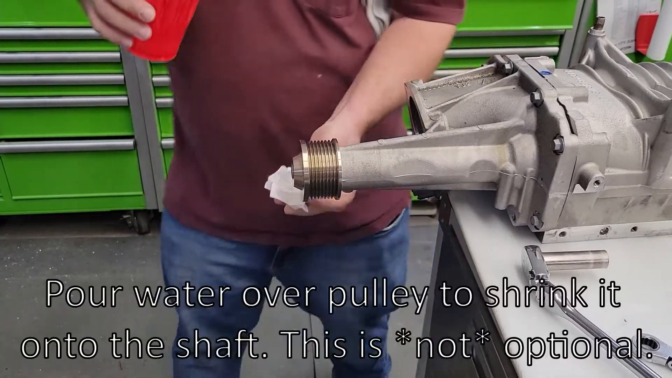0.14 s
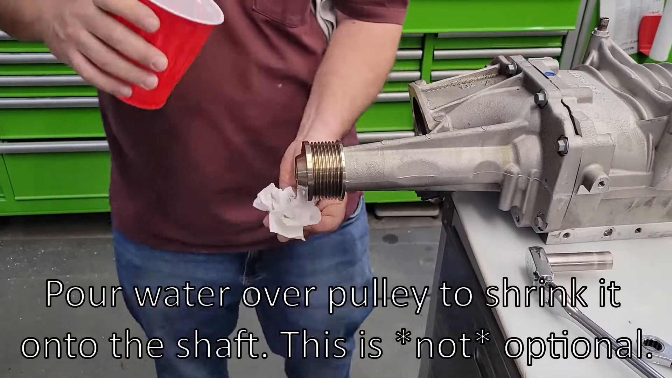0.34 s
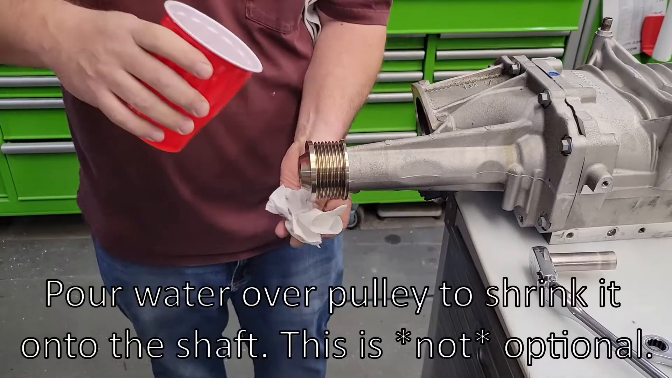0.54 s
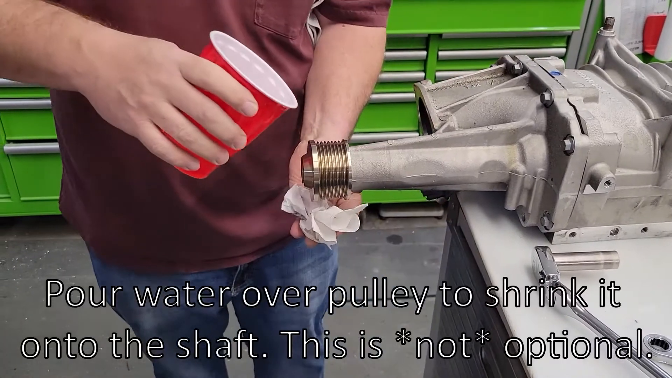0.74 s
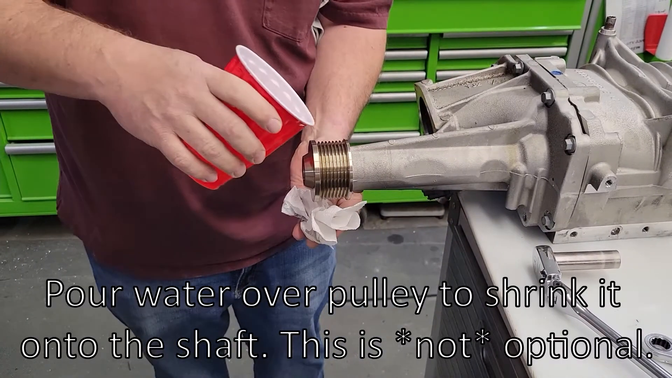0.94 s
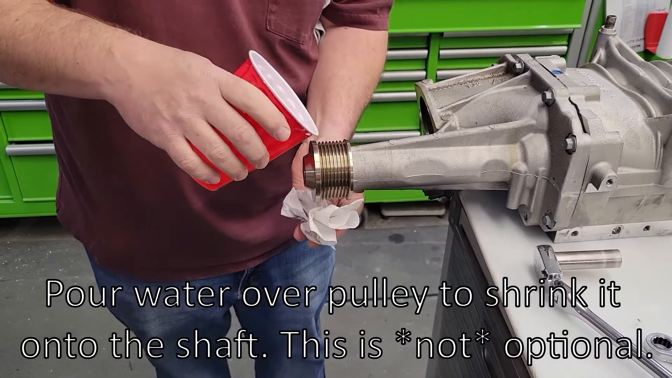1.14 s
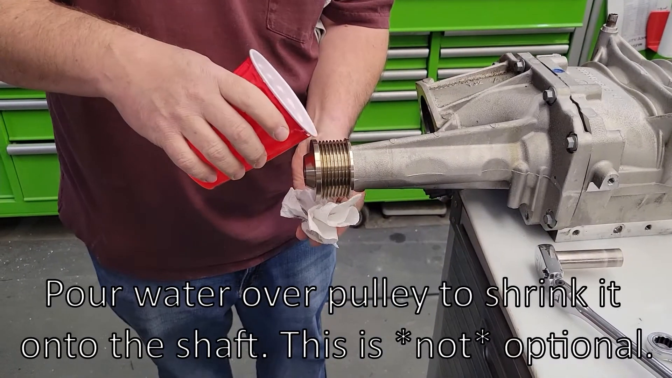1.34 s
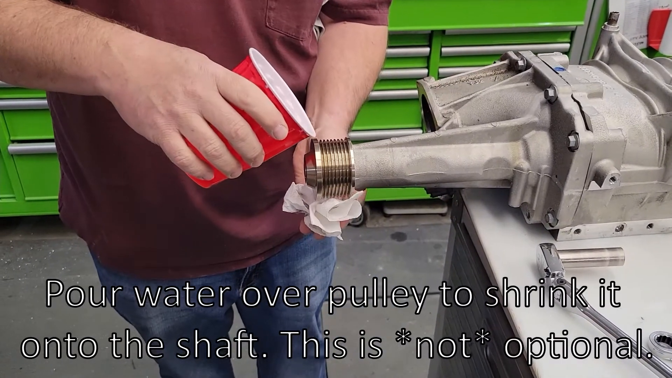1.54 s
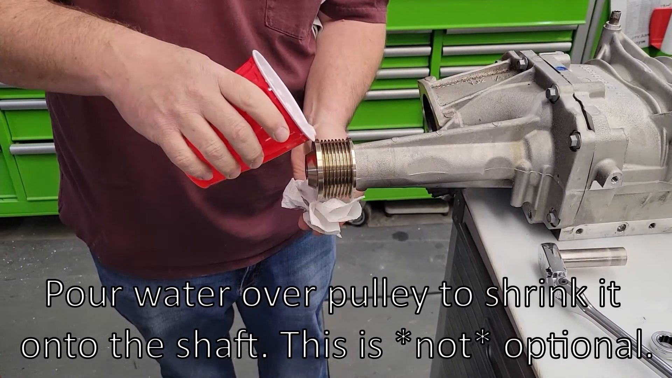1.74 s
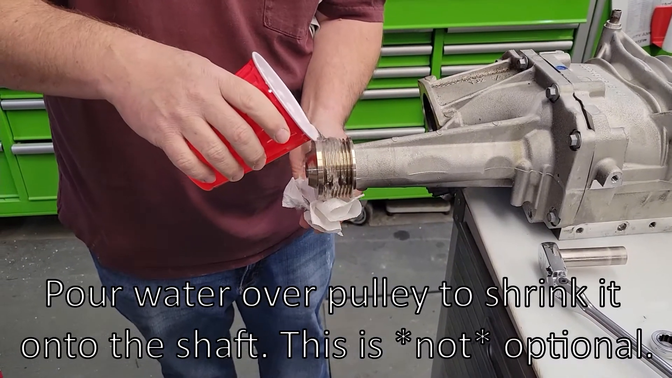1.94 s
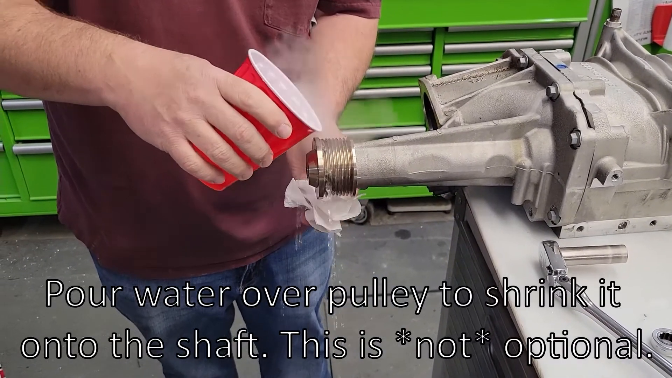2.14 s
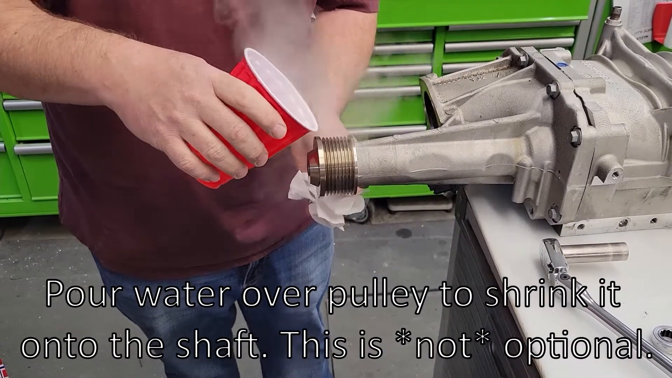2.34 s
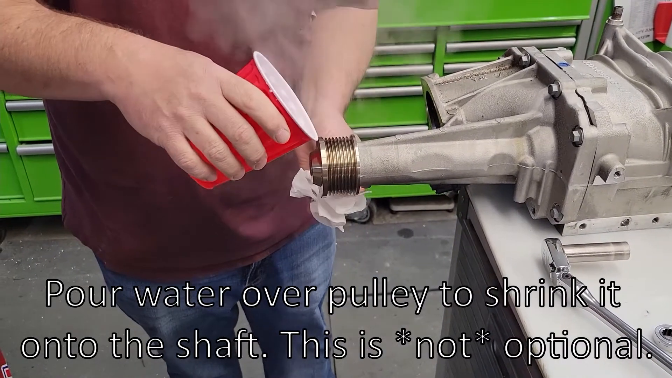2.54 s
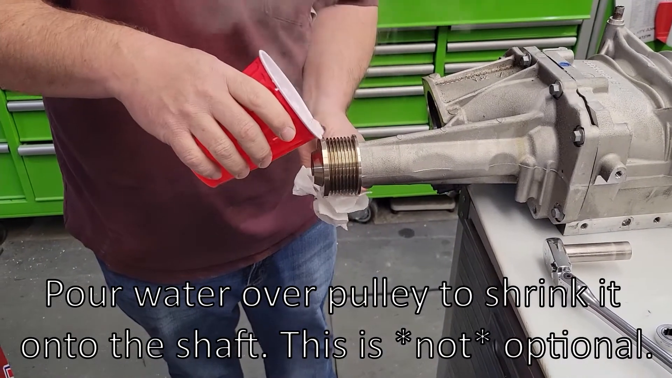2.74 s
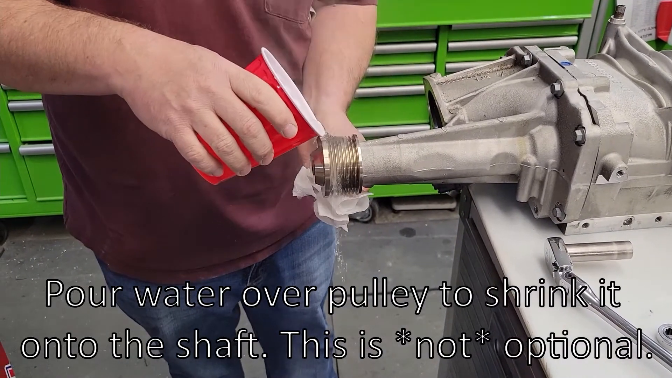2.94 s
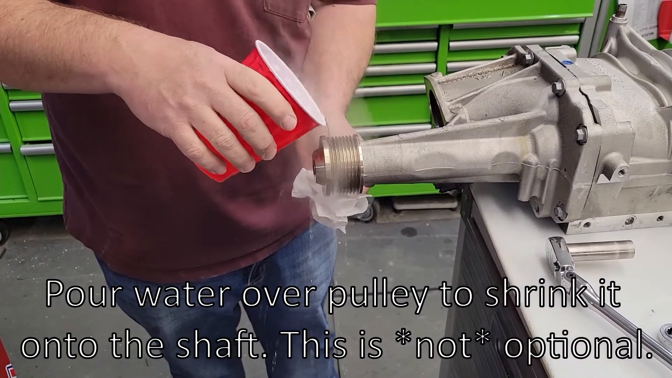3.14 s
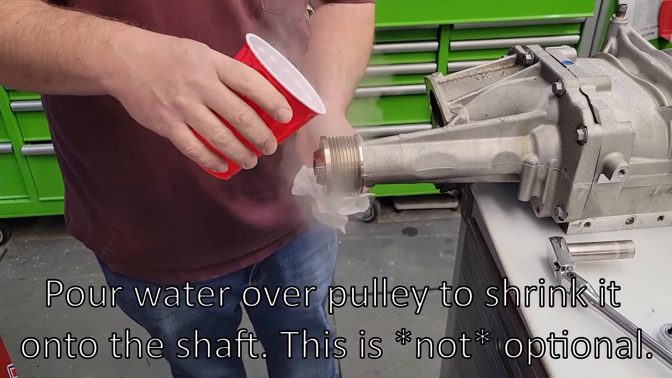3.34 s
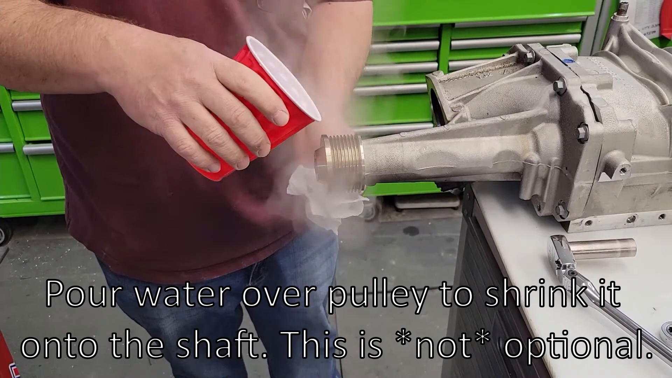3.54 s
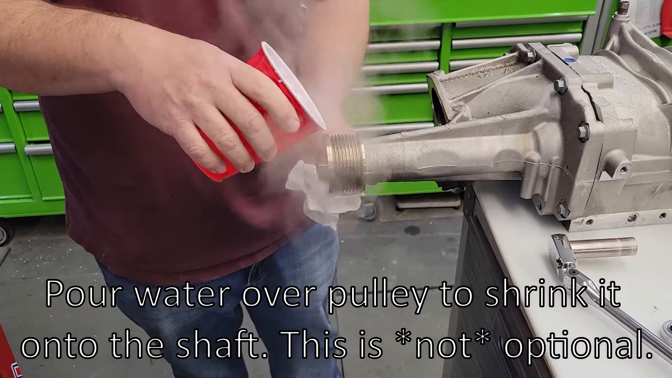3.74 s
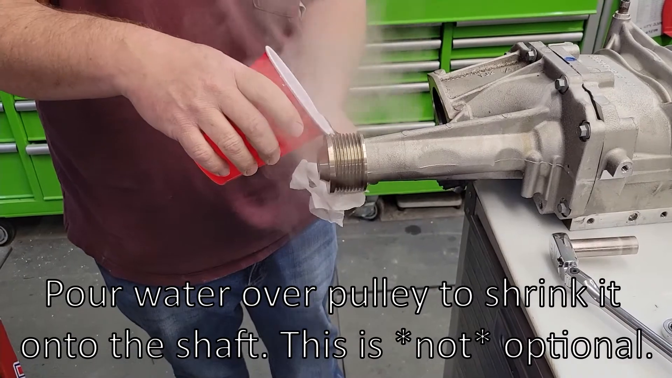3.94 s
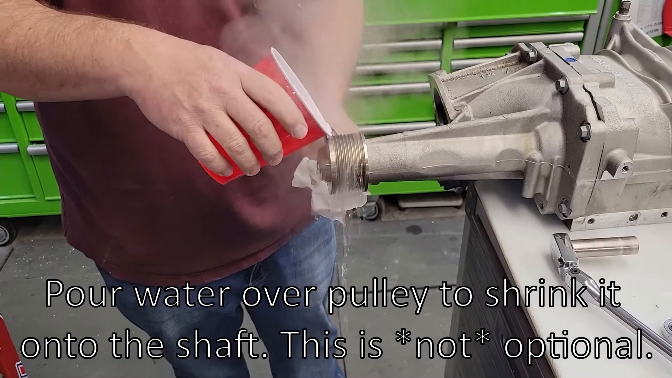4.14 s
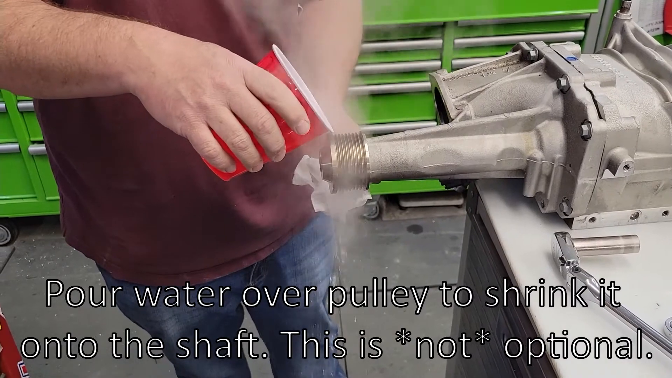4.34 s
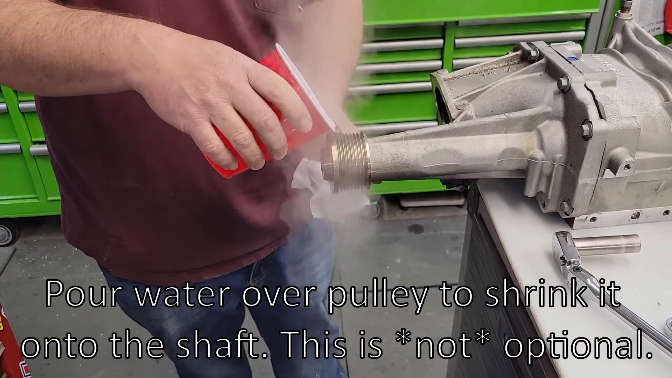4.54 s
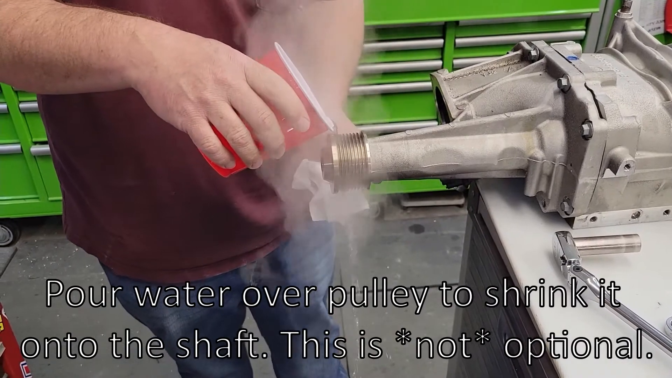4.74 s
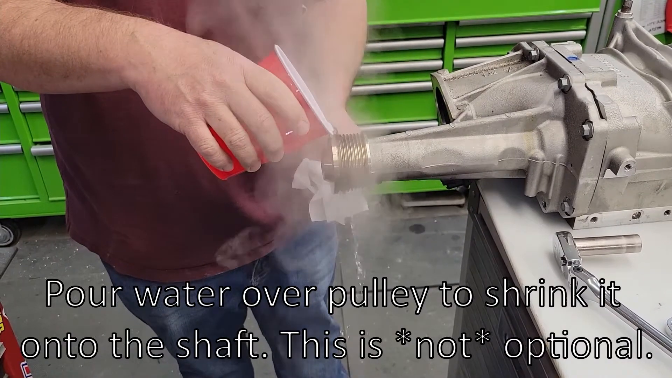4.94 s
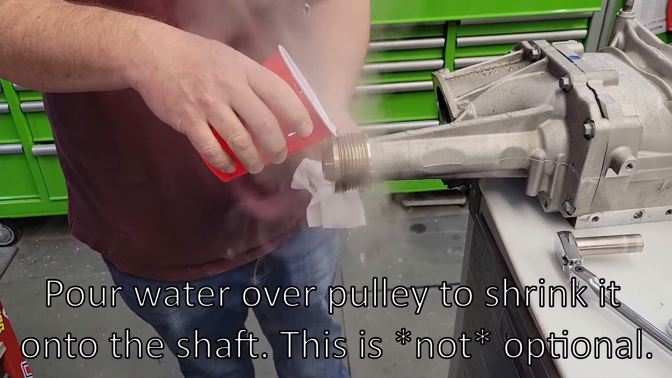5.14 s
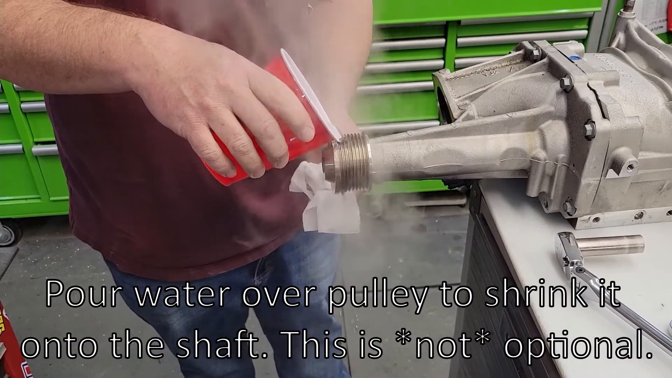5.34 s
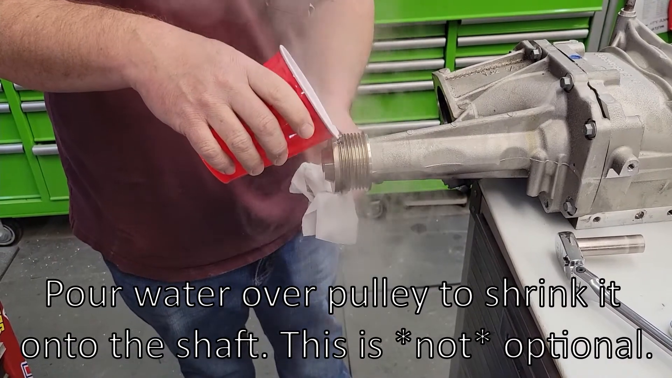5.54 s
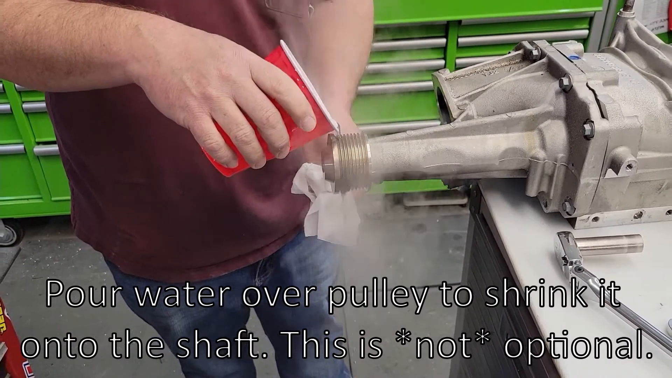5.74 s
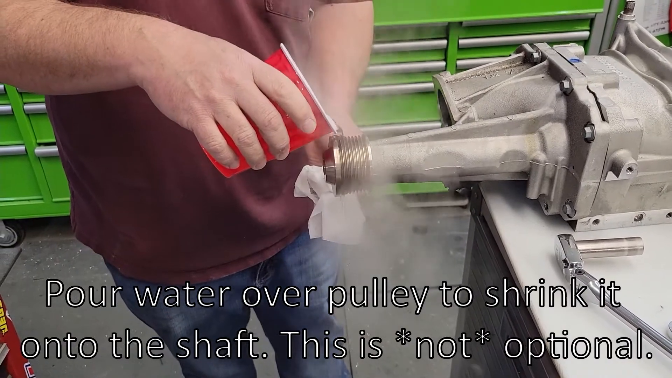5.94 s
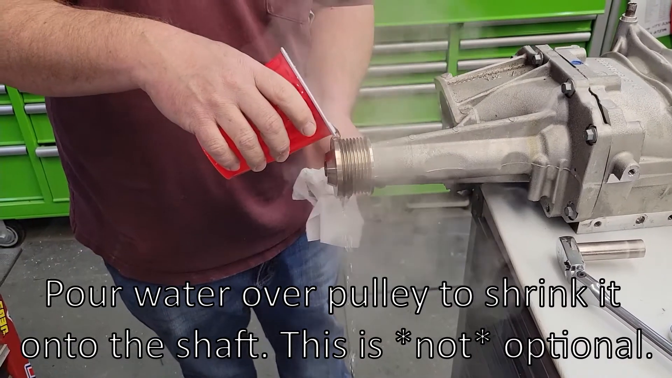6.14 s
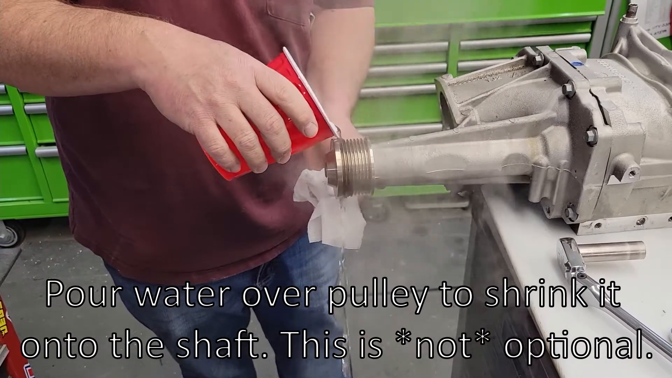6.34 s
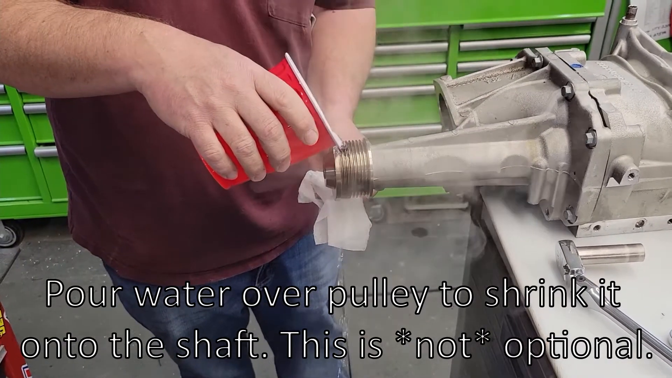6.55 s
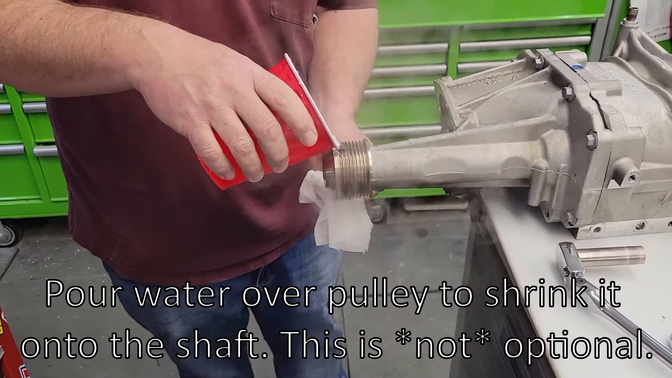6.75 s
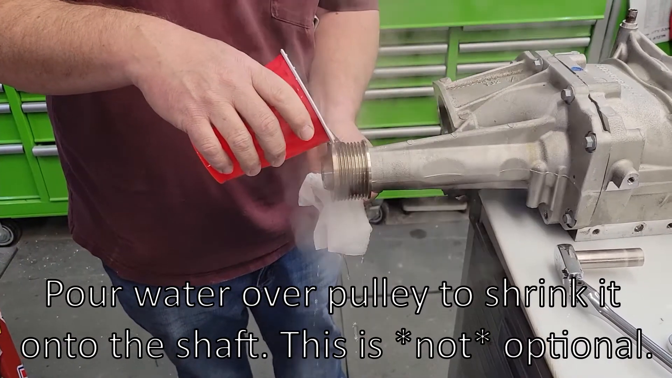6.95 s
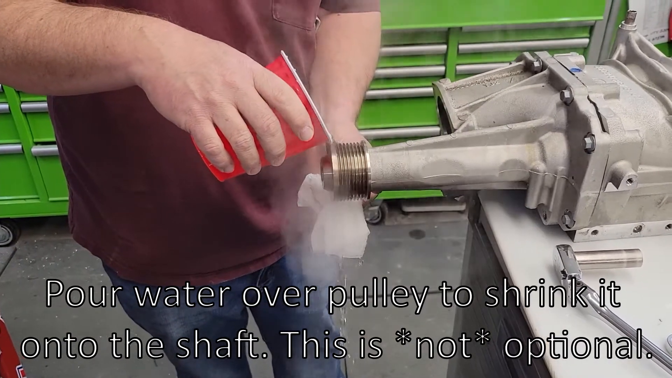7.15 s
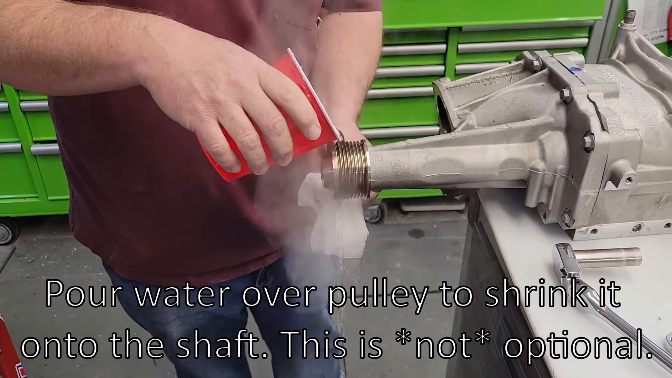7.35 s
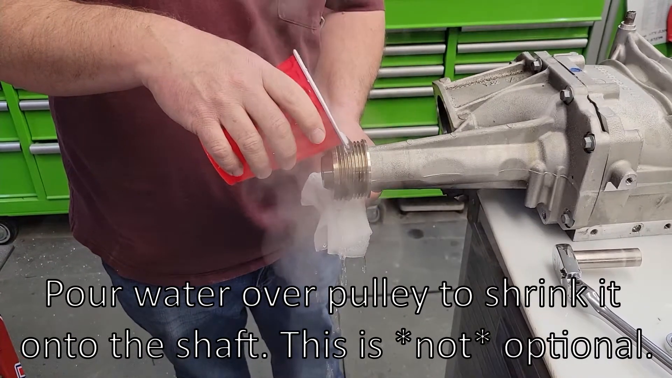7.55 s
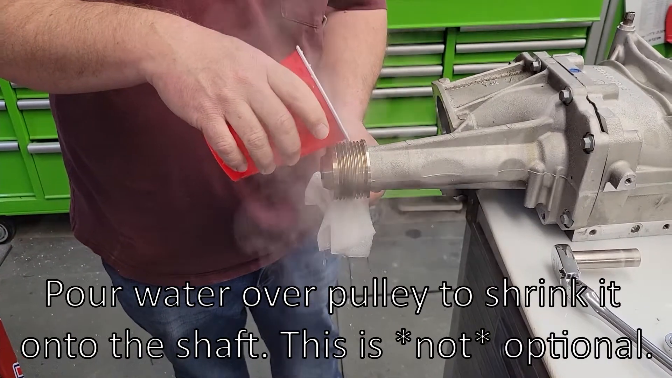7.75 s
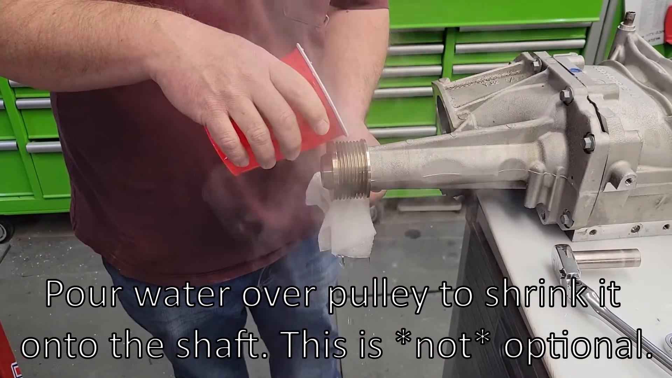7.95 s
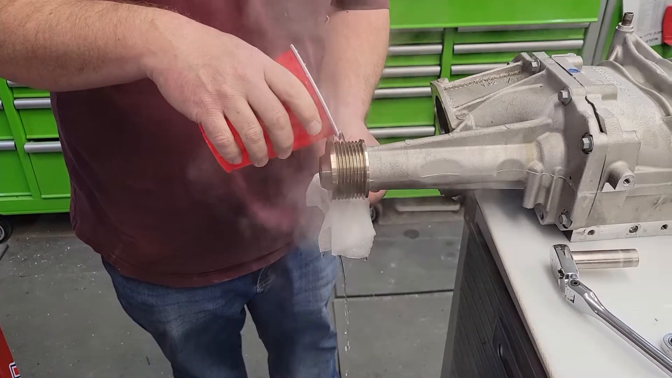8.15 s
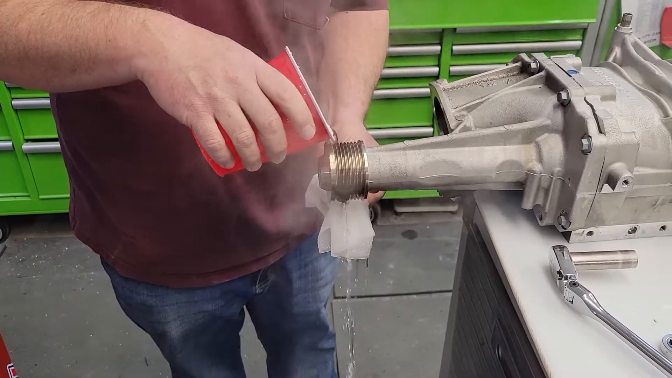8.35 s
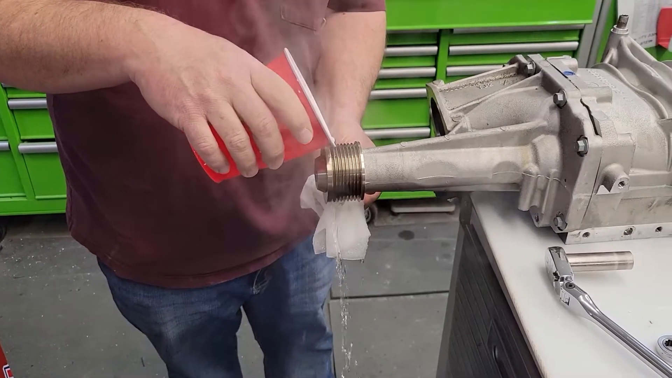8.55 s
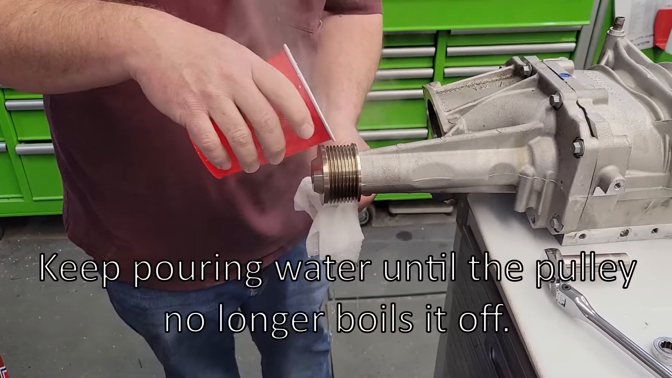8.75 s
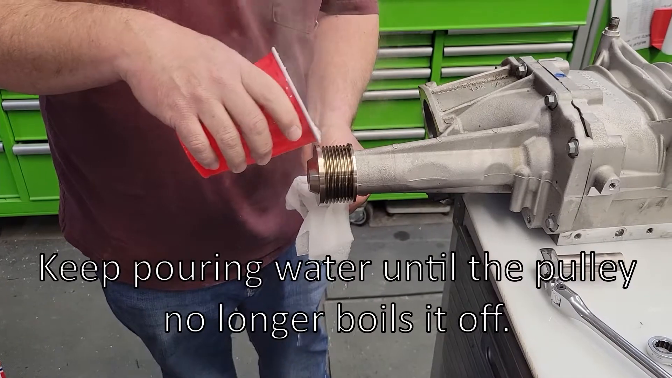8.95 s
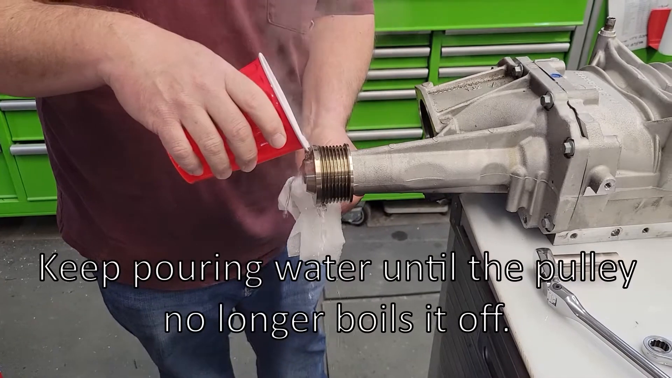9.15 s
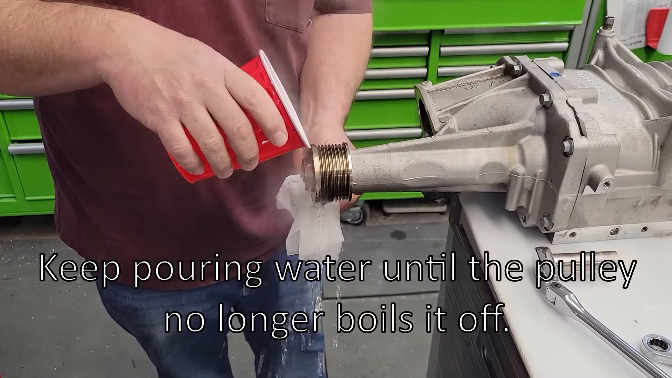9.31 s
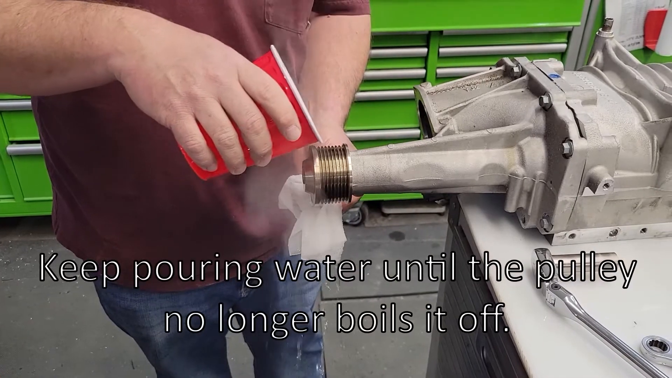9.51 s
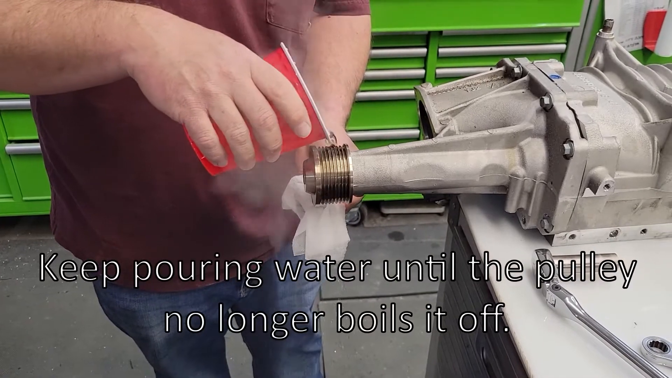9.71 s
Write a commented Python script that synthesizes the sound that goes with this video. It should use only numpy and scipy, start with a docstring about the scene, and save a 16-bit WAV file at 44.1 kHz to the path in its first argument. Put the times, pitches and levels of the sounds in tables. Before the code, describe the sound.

Close stereo pickup on a hot metal part in a reverberant workshop. Brief rustling and small hard clacks come first over quiet room air and hum. Steam flares sharply, with a breathy hollow note as the first burst dries away, flares again, then roars brightest and continues as a fluctuating sizzle. Boiling weakens to fine crackle, ticking pops and puffs, then one final softer fizz before it thins.

```python
"""Water on a hot pulley

Water is poured from a cup over a hot steel pulley: two splashes, a third running into a long pour, a last splash.
Steam is random bubble bursts, filtered and split into five bands; drops spit as a sine ping plus a noise puff.
First, clothes and paper rustle (filtered bursts) and handling knocks ring in the room (clack, modes, echoes).
Throughout, a workshop adds air noise, a low machine hum and a thin whine."""
import sys
import numpy as np
from scipy import signal
from scipy.fft import rfft, irfft
from scipy.io import wavfile

SR = 44100
rng = np.random.default_rng(int(sys.argv[2]) if len(sys.argv) > 2 else 0)


def file_out(sig):
    """Save sig as 16-bit WAV at sys.argv[1]."""
    # one column per channel
    cols = np.atleast_2d(sig).T
    # limit, then scale
    lim = np.clip(cols, -1, 1)
    pcm = np.round(lim * 32767).astype(np.int16)
    wavfile.write(sys.argv[1], SR, pcm)


N = 431298
TIME_S = np.arange(N) / SR
FREQ_HZ = np.maximum(np.arange(N // 2 + 1) * SR / N, 1)

# workshop air, relative spectrum: f/Hz, density/dB per Hz
AIR_SPECTRUM = [(15, -27), (25, -11), (64, -6), (114, -10.5), (206, -16), (309, -18.5), (335, -13.5),
                (439, -28), (754, -21), (1440, -42), (3920, -40), (6740, -41.5), (9320, -65), (12200, -51),
                (16000, -65)]
# machine hum: f/Hz, level/dB
HUM_TONES = [(37.7, -76), (80.7, -68.5), (107.7, -64.5)]
# whine of workshop electronics: f/Hz, level/dB
WHINE_TONES = [(3068, -82), (12371, -94)]
# clothes and paper towel, settling as the cup comes into place: t/s, level/dB
RUSTLE_LEVEL = [(0, -56.5), (0.07, -55.5), (0.16, -63), (0.25, -55.5), (0.32, -62), (0.47, -56),
                (0.78, -69.5), (1.2, -71.5), (1.75, -74.5)]
# cloth, relative spectrum: f/Hz, density/dB per Hz
CLOTH_SPECTRUM = [(120, -35), (300, -1), (800, 0), (1800, -0.5), (2500, -1.5), (4200, 4), (5800, -6),
                  (8000, -13), (10200, -29), (12500, -14), (15600, -18)]
# handling knocks: t/s, blow/dB, thud/dB re blow, tick/dB re blow; all before mixing gains
KNOCK_EVENTS = [(0.088, -34.5, -19, -10), (0.106, -46, -25, -23), (0.341, -49, -12, -6),
                (0.411, -39, -10, -3.5), (0.431, -32, -20, -15), (0.798, -24.5, -37, -23)]
# ring of the knocks: f/Hz, relative level/dB, t60/s
RING_MODES = [(990, 2, 0.18), (1720, -3, 0.23), (2090, -15, 0.37), (2832, -26, 2), (4059, -22, 0.43)]
# clack, relative spectrum: f/Hz, density/dB per Hz
CLACK_SPECTRUM = [(120, -57), (200, -19), (711, -15), (984, 1), (1510, -5.5), (1670, -4.5), (5460, -20.5),
                  (9280, -72), (12000, -52), (15600, -84), (22000, -120)]
# steam, relative spectrum: f/Hz, density/dB per Hz
STEAM_SPECTRUM = [(60, -72), (200, -16), (430, -22), (800, -13.5), (1600, -14), (2500, -7.5), (3300, -4),
                  (3900, -0.5), (4900, 4), (6000, 1), (8400, -3.5), (9500, -9.5), (11100, -15.5),
                  (12300, -7.5), (15600, -8.5)]
# gaps between cup, pulley and housing: f/Hz, width/Hz, lift/dB
GAP_RESONANCES = [(516.7, 16, 11), (734, 44, 4), (879, 38, 7), (1026, 14, 8.5), (1190, 71, 5.5),
                  (1380, 24, 7), (1420, 38, 2), (1822, 56, 8.5), (1920, 25, 4.5), (2482, 21, 8.5),
                  (2888, 340, 11), (3637, 570, 10.5), (3990, 97, 8.5), (4290, 120, 7), (4750, 600, 6.5),
                  (5290, 37, 8.5), (6700, 80, 1)]
# pulley at the two ports: f/Hz, left re right/dB, likeness/0-1, left lead/rad
PORT_RESPONSE = [(200, 0.3, 0.92, 0.1), (500, 2.6, 0.67, 1.6), (1200, -0.6, 0.4, 1.1),
                 (2300, -0.1, 0.48, 1.0), (3300, -3.0, 0.39, 0.3), (4000, -8.0, 0.65, 1.0),
                 (5000, -8.4, 0.64, 2.6), (6000, 0.6, 0.23, 3.3), (7500, 2.3, 0.56, 0.1),
                 (8700, 2.6, 0.48, 0.0), (9600, 7.9, 0.16, 0.3), (10700, 6.9, 0.14, 0.0),
                 (12200, -2.6, 0.9, 0.0), (15300, -2.6, 0.93, 0.0)]
# splashes: t/s, sizzle/dB, attack/s, hold/s, drying/dB per s, fizz/dB re sizzle, spray/dB re sizzle
SPLASH_EVENTS = [(1.789, -21.5, 0.081, 0.43, 63.5, -9.5, 2.5), (2.77, -21.5, 0.12, 0.56, 27, -7.5, 6.5),
                 (3.929, -17.5, 0.22, .24, 24.5, -7, 7), (9.027, -25.5, 0.16, .38, 65, -2.5, 7)]
# long pour, wavering with the cup's tilt, ending in a simmer: t/s, sizzle/dB, spray/dB re sizzle
POUR_LEVEL = [(4.3, -39, -12), (4.55, -34, 5), (4.62, -31.5, 9), (5.6, -31.5, 8), (5.95, -37, 4),
              (6.15, -32, 9), (6.38, -41, 10), (6.58, -37, 7), (6.63, -33.5, 10), (7.02, -30, 3),
              (7.3, -34, 4), (7.36, -41.5, 3.5), (7.5, -41, 6), (7.63, -39.5, 9.5), (7.7, -31, 9),
              (8.1, -39.5, 4.5), (8.3, -38.5, 5.5), (8.45, -43.5, 5.5), (8.68, -44.5, 5.5), (8.79, -53, 3),
              (8.89, -44.5, 2.5), (9.77, -43.5, 2)]
# spitting drops, levels before the port response: t/s, ping peak/dB, ping f/Hz, puff/dB
POP_EVENTS = [(2.549, -27, 4100, -45.5), (2.6, -34, 3810, -51), (2.6447, -38, 4970, -51),
              (6.6011, -6.5, 3600, -32.5), (8.639, -15, 3870, -35), (8.7265, -16.5, 4670, -38),
              (8.8131, -33, 6030, -45), (8.9087, -3.5, 4150, -40), (8.9221, -16, 4220, -31.5),
              (9.002, -13, 4170, -50), (9.0404, -9, 5350, -40), (9.607, -24, 7040, -38)]
# puff, relative spectrum: f/Hz, density/dB per Hz
SPIT_SPECTRUM = [(1000, -37), (2200, -12), (3200, -9), (5000, 6.5), (7500, 0), (9500, -15), (11200, -11),
                 (12500, -2), (15600, -19)]

AIR_DB = -59.5
SAG_DB_PER_S = 12.5  # a splash cools the metal under it and boils less and less
SPRAY_SAG_DB_PER_S = 6  # extra: the finest spray dies first
POUR_FIZZ_DB = -5.5  # re sizzle
# bigger bubbles need time to grow: low bands trail the sizzle; their levels hold at full boil
FULL_BOIL_DB = -30
BUBBLING_DB, BUBBLING_LAG_S, BUBBLING_POWER = -41, 0.029, 0.88
GURGLE_DB, GURGLE_LAG_S, GURGLE_POWER = -58, 0.17, 0.57
CHURN_DB, CHURN_PEAK_S, CHURN_SHARPNESS = -52.5, 0.39, 8.7
HOLLOW_DB, HOLLOW_START_S, HOLLOW_PEAK_S = -41, 1.82, 2.215
HOLLOW_RISE_DB_PER_S, HOLLOW_FALL_DB_PER_S = 19, 85
CRACK_DB, CRACK_T60_S, PUFF_T60_S = 14.5, 0.0051, 0.1  # crack re puff
TOP_HZ = 15800


def undb(db):
    """Decibels to gain."""
    return 10 ** (np.asarray(db) / 20)


def level(x, rms_db):
    """Scale to an rms level, taken on the mean of the channels."""
    mid = np.atleast_2d(x).mean(axis=0)
    return x * undb(rms_db) / np.sqrt(np.mean(mid ** 2))


def curves(rows):
    """Table columns, linear in time."""
    t_s, *columns = np.transpose(rows)
    return [np.interp(TIME_S, t_s, c) for c in columns]


def over_hz(rows):
    """Table columns, linear in log frequency."""
    hz, *columns = np.transpose(rows)
    return [np.interp(np.log(FREQ_HZ), np.log(hz), c) for c in columns]


def during(rows, fade_s=0.0081):
    """Gate: 1 while a table lasts, with short fades."""
    since_start_s = TIME_S - rows[0][0]
    to_end_s = rows[-1][0] + 2 * fade_s - TIME_S
    return np.clip(np.minimum(since_start_s, to_end_s) / fade_s, 0, 1)


def shape(x, gain):
    """Filter by a gain per frequency."""
    return irfft(rfft(x) * gain, N)


def causal(db):
    """Minimum-phase response of a dB curve: it rings only after a blow."""
    cepstrum = irfft(np.log(undb(db)), N)
    cepstrum[1:N // 2] *= 2
    cepstrum[N // 2 + 1:] = 0
    return np.exp(rfft(cepstrum))


def resonance(hz, width_hz):
    """Response of one resonance, gain 1 at its centre."""
    return 1 / (1 + 1j * (FREQ_HZ ** 2 - hz ** 2) / (FREQ_HZ * width_hz))


def walk(rate_hz):
    """Slow random drift, rms 1: low-passed noise."""
    return level(shape(rng.standard_normal(N), 1 / (1 + (FREQ_HZ / rate_hz) ** 4)), 0)


def add(track, t_s, sound):
    """Mix a short sound into a track."""
    start = max(int(t_s * SR), 0)
    track[start:start + len(sound)] += sound[:N - start]


def echoes(x, t60_s, db, gap_s=0.00058):
    """Dense decaying reflections: unit-energy noise tails, independent per port."""
    t = TIME_S[:SR]
    tail = rng.standard_normal((2, SR)) * undb(-60 * t / t60_s) * (t > gap_s)
    tail /= np.sqrt(np.sum(tail ** 2, axis=1, keepdims=True))
    return undb(db) * signal.fftconvolve(x[None], tail, axes=1)[:, :N]


def diffuse(alike_hz):
    """Stereo noise from all around: the ports agree only in the bass."""
    mid, side = rng.standard_normal((2, N))
    side = shape(side, FREQ_HZ / np.hypot(FREQ_HZ, alike_hz))
    return mid + np.array([[1], [-1]]) * side


def ports(direct, scattered):
    """Direct sound shares a source with a left phase lead; scattered sound differs between the ports."""
    balance_db, likeness, lead_rad = over_hz(PORT_RESPONSE)
    likeness = np.clip(likeness, 0, 1)
    half = np.array([[0.5], [-0.5]])
    gain = undb(half * balance_db)
    gain /= np.sqrt(np.mean(gain ** 2, axis=0))
    shared = shape(direct, gain * np.sqrt(likeness) * np.exp(1j * half * lead_rad))
    separate = shape(scattered, gain * np.sqrt(1 - likeness))
    return shared + separate


def bursts(per_second, spread_db):
    """Random impulses of random size, a few much larger; power independent of rate."""
    chance = per_second / SR
    size = undb(spread_db * np.minimum(rng.exponential(size=N), 5))
    hits = rng.standard_normal(N) * size * (rng.random(N) < chance)
    return level(hits / np.sqrt(np.minimum(chance, 1)), 0)


def workshop():
    """Ventilation noise with level drift, phase-wavering machine hum and a narrow-band whine."""
    air = level(shape(diffuse(alike_hz=375), undb(over_hz(AIR_SPECTRUM)[0])), AIR_DB)
    hum = 0
    for hz, db in HUM_TONES:
        hum = hum + level(np.sin(2 * np.pi * hz * TIME_S + 1.5 * walk(5.0)), db)
    whine = 0
    for hz, db in WHINE_TONES:
        whine = whine + level(shape(rng.standard_normal(N), resonance(hz, width_hz=100) ** 2), db)
    return air * undb(0.26 * walk(4.2)) + hum + whine


def rustle():
    """Cloth and paper crinkle as the arms move: impulses with room echoes."""
    crinkle = bursts(1500, spread_db=0.0)
    heard = 0.42 * crinkle + echoes(crinkle, t60_s=1.0, db=3.0)
    sound = shape(heard, undb(over_hz(CLOTH_SPECTRUM)[0]))
    return level(sound, curves(RUSTLE_LEVEL)[0]) * during(RUSTLE_LEVEL)


def knocks():
    """Each knock is a dry clack with dull thud, bright tick and faint modal ring; the workshop answers."""
    blows, thuds, ticks = np.zeros((3, N))
    t = TIME_S[:SR // 2]
    for t_s, db, thud_db, tick_db in KNOCK_EVENTS:
        add(blows, t_s + 0.00202, undb([db]))
        add(thuds, t_s + 0.0022, undb(db + thud_db - 60 * t / 0.12))
        add(ticks, t_s + 0.00098, undb(db + tick_db - 60 * t / 0.082))

    clack = irfft(causal(over_hz(CLACK_SPECTRUM)[0]), N)[:len(t)]
    clack = clack / np.max(abs(clack))
    ring = sum(undb(db - 60 * t / t60_s) * np.sin(2 * np.pi * hz * t) for hz, db, t60_s in RING_MODES)
    dry = signal.fftconvolve(blows, clack + undb(-28) * ring)[:N]

    body = resonance(hz=377, width_hz=450) ** 2 + undb(-3) * resonance(hz=1230, width_hz=320) ** 2
    thud = level(shape(rng.standard_normal(N), body), 2.3) * thuds
    bright = resonance(hz=3870, width_hz=1200) ** 2
    tick = level(shape(rng.standard_normal(N), bright), -2) * ticks

    near = echoes(dry, t60_s=0.12, db=3.5, gap_s=0.0013)
    far = echoes(dry + 0.74 * thud, t60_s=0.99, db=-4)
    # extra reverberation of the middle tones
    middle = shape(dry, resonance(hz=1110, width_hz=350) ** 2)
    far = far + echoes(middle, t60_s=0.73, db=1.0)
    return undb(-5) * dry + thud + tick + near + far


def splash(t_s, db, attack_s, hold_s, drying_db_per_s, fizz_db, spray_db):
    """Sizzle, fizz, spray gains of a splash: flares up, sags while the metal is wet, then dries off."""
    age_s = np.maximum(TIME_S - t_s, 0)
    drying_db = drying_db_per_s * np.maximum(age_s - hold_s, 0)
    sizzle = (1 - np.exp(-age_s / attack_s)) * undb(db - SAG_DB_PER_S * age_s - drying_db)
    fizz_ratio = undb(fizz_db) * np.ones(N)
    spray_ratio = undb(spray_db - SPRAY_SAG_DB_PER_S * age_s)
    return sizzle * np.array([np.ones(N), fizz_ratio, spray_ratio])


def pour():
    """Sizzle, fizz, spray gains of the running stream."""
    db, spray_db = curves(POUR_LEVEL)
    return undb([db, db + POUR_FIZZ_DB, db + spray_db]) * during(POUR_LEVEL)


def churn(t_s):
    """Gain of a splash's big bubbles: a low swell, late, as the water starts to churn."""
    age = np.maximum(TIME_S - t_s, 0) / CHURN_PEAK_S
    return undb(CHURN_DB) * (age * np.exp(1 - age)) ** CHURN_SHARPNESS


def trail(gain, lag_s):
    """Gain delayed and smoothed by three one-pole stages, total lag lag_s."""
    keep = np.exp(-3 / (lag_s * SR))
    for _ in range(3):
        gain = signal.lfilter([1 - keep], [1, -keep], gain + 1e-12)
    return gain


def steam_colour():
    """Gain per frequency of escaping steam, lifted where the gaps resonate."""
    lift_db = sum(db * abs(resonance(hz, width_hz)) ** 2 for hz, width_hz, db in GAP_RESONANCES)
    return undb(over_hz(STEAM_SPECTRUM)[0] + lift_db)


def steam():
    """Hard boiling merges bursts into a smooth hiss; weak boiling thins them to a crackling fizz."""
    power = pour() ** 2 + sum(splash(*row) ** 2 for row in SPLASH_EVENTS)
    sizzle_gain, fizz_gain, spray_gain = np.sqrt(power)
    boil = sizzle_gain / undb(FULL_BOIL_DB)
    bubbling_gain = undb(BUBBLING_DB) * trail(boil ** BUBBLING_POWER, BUBBLING_LAG_S)
    steady_gurgle = undb(GURGLE_DB) * trail(np.minimum(boil, 1) ** GURGLE_POWER, GURGLE_LAG_S)
    gurgle_gain = np.hypot(steady_gurgle, sum(churn(row[0]) for row in SPLASH_EVENTS))

    source = bursts(3000 + 24000 * boil, spread_db=2.0)
    hiss = shape(ports(source, rng.standard_normal((2, N))), steam_colour())

    # big bubbles low, finest spray highest; each band drifts on its own
    above = [1 / (1 + (hz / FREQ_HZ) ** 16) for hz in (520, 2400, 5500, 11000)]
    gurgle = level(shape(hiss, 1 - above[0]), 0) * gurgle_gain * undb(1.8 * walk(10))
    bubbling = level(shape(hiss, above[0] - above[1]), 0) * bubbling_gain * undb(0.8 * walk(16))
    sizzle = level(shape(hiss, above[1] - above[2]), 0) * sizzle_gain * undb(0.85 * walk(20))
    fizz = level(shape(hiss, above[2] - above[3]), 0) * fizz_gain * undb(0.5 * walk(36))
    spray = level(shape(hiss, above[3]), 0) * spray_gain * undb(1.1 * walk(18))
    sputter = undb(0.5 * walk(32))
    return (gurgle + bubbling + sizzle + fizz + spray) * sputter


def hollow():
    """Steam blown across the gap under the cup: a breathy note that builds, then dies as the metal dries."""
    note = shape(diffuse(alike_hz=1500), resonance(hz=828, width_hz=130) ** 2)
    late_s = TIME_S - HOLLOW_PEAK_S
    db = HOLLOW_DB + np.minimum(HOLLOW_RISE_DB_PER_S * late_s, -HOLLOW_FALL_DB_PER_S * late_s)
    fade_in = np.clip((TIME_S - HOLLOW_START_S) / 0.02, 0, 1)
    return level(note, db) * fade_in


def pops():
    """A trapped drop bursts with a crack and a ping of a few cycles, then spits a short puff of steam."""
    pings, puffs = np.zeros((2, N))
    t = TIME_S[:SR // 10]
    swell = (t / 0.00017) ** 3 * np.exp(-t / 0.00017)
    swell = swell / swell.max()
    puff_decay = undb(-60 * t / PUFF_T60_S) + undb(CRACK_DB - 60 * t / CRACK_T60_S)
    for t_s, db, hz, puff_db in POP_EVENTS:
        add(pings, t_s, undb(db) * np.sin(2 * np.pi * hz * t) * swell)
        add(puffs, t_s + 0.0004, undb(puff_db) * puff_decay)
    spit = level(shape(rng.standard_normal(N), undb(over_hz(SPIT_SPECTRUM)[0])), 0) * puffs
    dry = pings + spit
    # bench and housing answer at once; the workshop is fainter and longer
    near = ports(dry, echoes(dry, t60_s=0.11, db=0.5))
    return near + echoes(dry, t60_s=0.36, db=-10)


def scene():
    """All sources at the two ports."""
    return workshop() + rustle() + knocks() + steam() + hollow() + pops()


def record(dry):
    """Elliptic low-pass: cuts the top."""
    return signal.sosfilt(signal.ellip(12, 0.1, 80, TOP_HZ, fs=SR, output="sos"), dry)


dry = scene()
out = record(dry)
file_out(out)
```